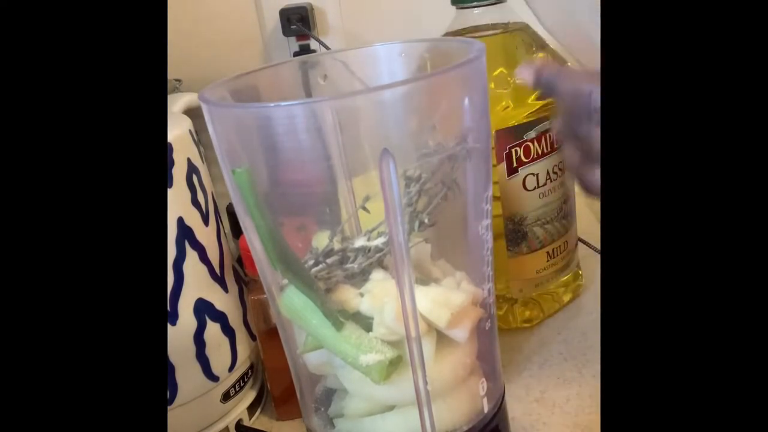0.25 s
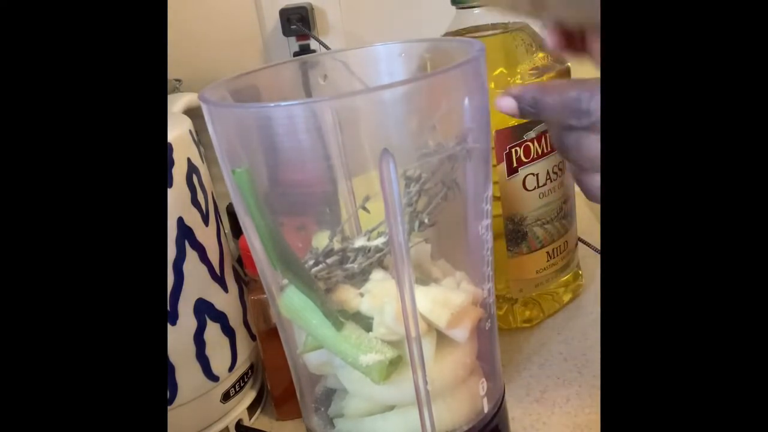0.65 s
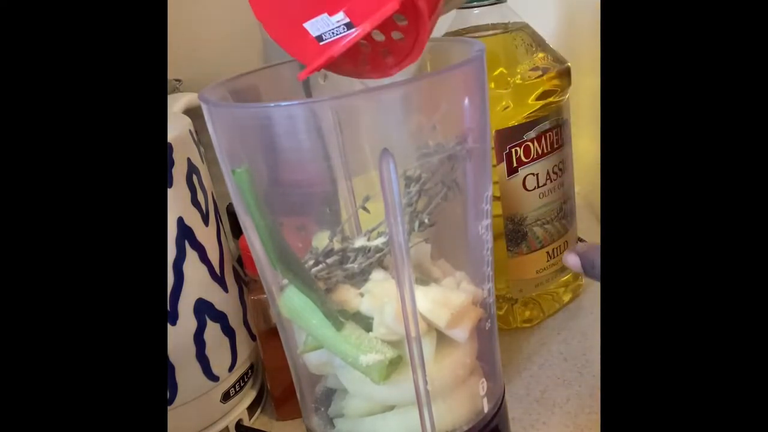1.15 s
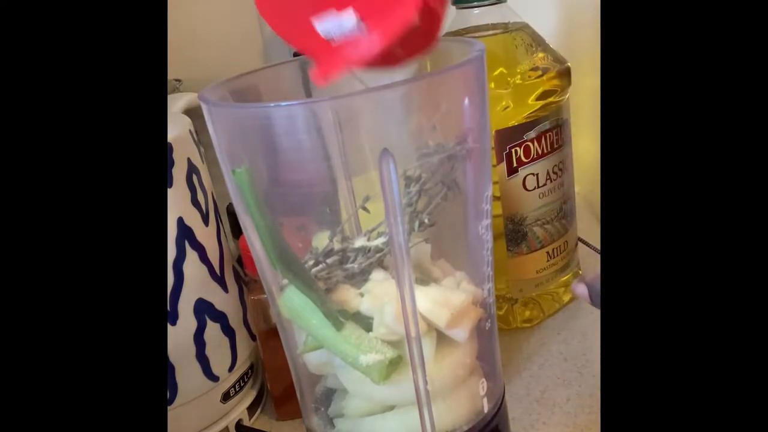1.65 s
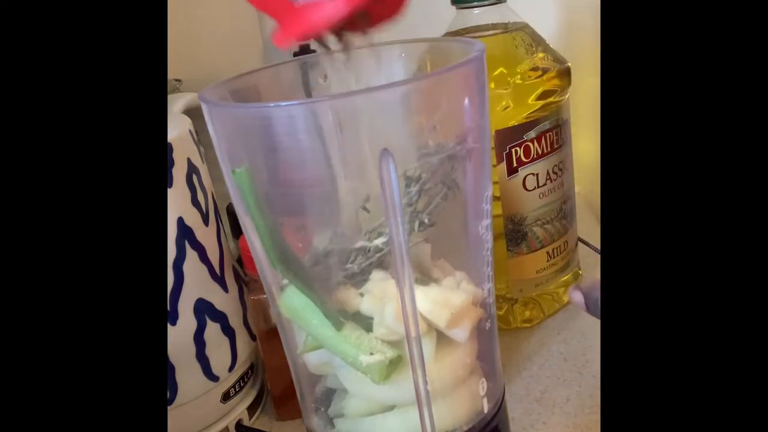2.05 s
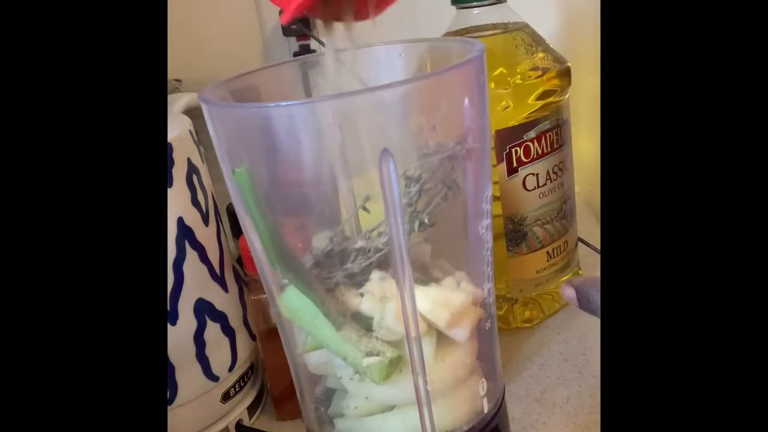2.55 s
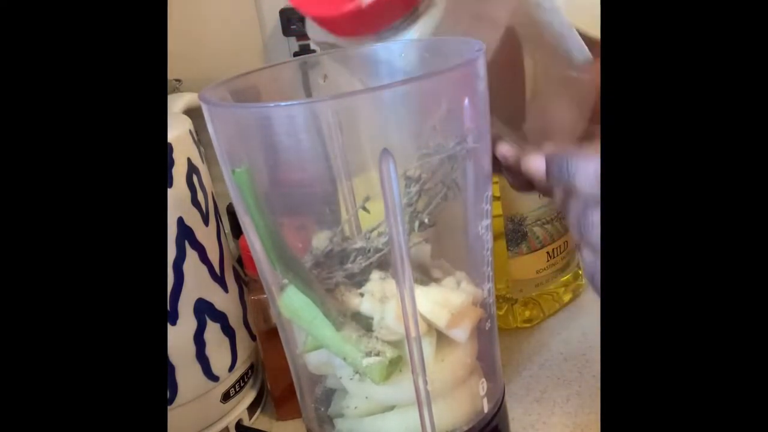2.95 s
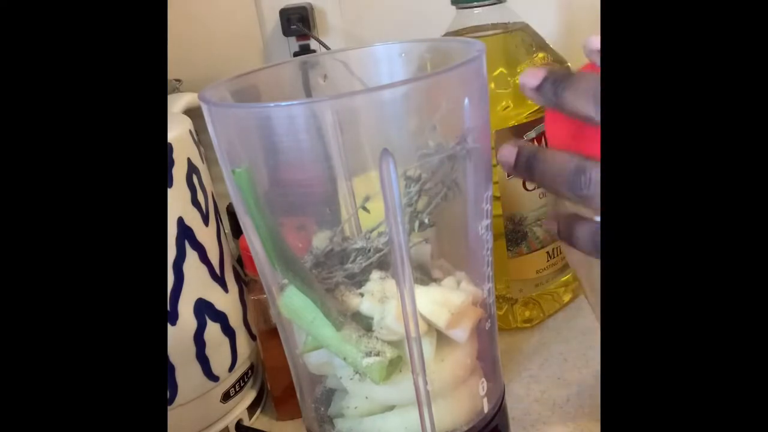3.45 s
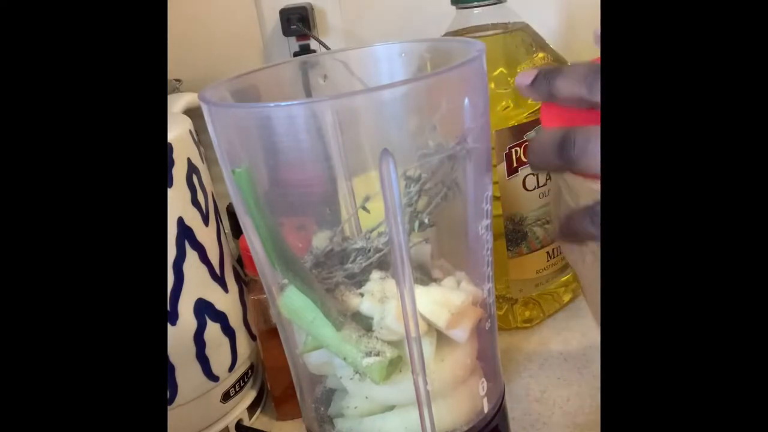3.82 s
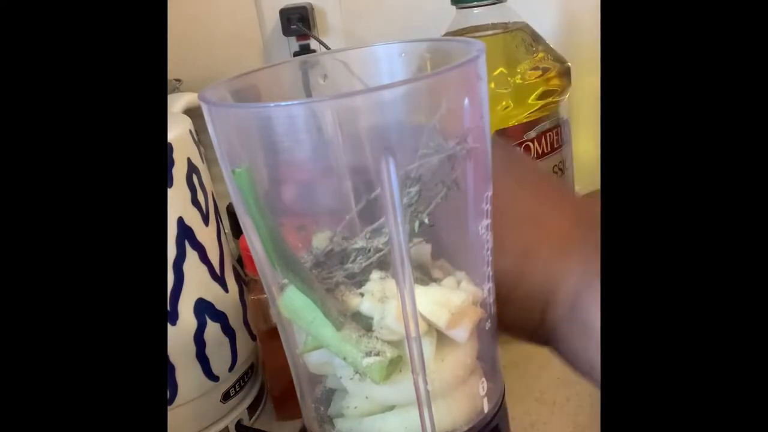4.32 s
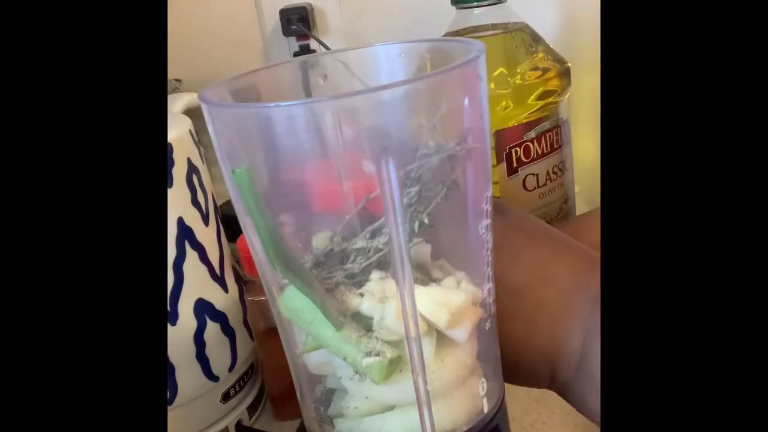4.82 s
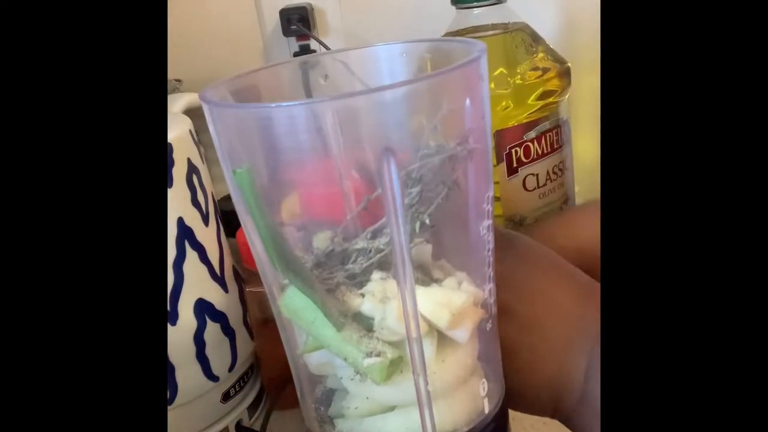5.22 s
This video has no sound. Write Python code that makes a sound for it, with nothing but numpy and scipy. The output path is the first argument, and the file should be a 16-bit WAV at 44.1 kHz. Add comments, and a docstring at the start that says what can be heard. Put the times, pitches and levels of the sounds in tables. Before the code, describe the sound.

Sparse plastic taps and faint spice rustles in a humming kitchen give way to a sharp lid snap, counter bumps and clinking jars.

```python
"""Spice shaker handled among jars

A plastic shaker is opened, tipped over a blender cup, snapped shut and pushed back among other jars.
Blows sum contact noise, decaying modes and low thumps; spice is random grains heard through a hollow.
Skin and pushed jars are coloured slip noise. A refrigerator hums in wavering lines over a dull rush.
Two microphone ports hear the handling from just to the right, with early scatter and a short tail."""
import sys
import numpy as np
from scipy import signal
from scipy.fft import rfft, irfft
from scipy.io import wavfile

SR = 44100
rng = np.random.default_rng(int(sys.argv[2]) if len(sys.argv) > 2 else 0)


def waveform_to_disk(signal):
    """Save audio, clipped to [-1, 1], as 16-bit WAV at the path in sys.argv[1]."""
    frames = np.transpose(np.atleast_2d(signal))
    scaled = np.clip(frames, -1, 1) * 32767
    samples = np.round(scaled).astype(np.int16)
    wavfile.write(sys.argv[1], SR, samples)


N = 241528
TIME_S = np.arange(N) / SR
FREQ_HZ = np.maximum(np.arange(N // 2 + 1) * SR / N, 1)

# Blow tables; levels are relative to the offsets given to strike():
# start_s, ring_db, crack_db, thud_db, modes_up_to_hz, ring_length_ratio, pitch_ratio
# shaker cap flicked and tapped, damped by fingers
CAP_CLICKS = [(1.6453, -21, -29, -38, 6000, 1.25, 1.0), (1.6525, -29, -39, -40, 900, 1.0, 1.1),
              (2.711, -33, -54, -43, 3500, 0.2, 1.0), (2.7205, -27, -42, -39, 4000, 0.22, 1.1),
              (2.782, -39, -58, -44, 1700, .3, 1.0), (2.8887, -35, -51, -64, 5000, 0.2, 1.3),
              (2.8905, -20.5, -72, -48, 1400, 0.28, 1.0), (2.8945, -23.5, -66, -47, 626, .7, 1.1),
              (2.901, -25, -70, -50, 800, .5, 1.0)]
# jar shut and put down
JAR_KNOCKS = [(3.490, -29, -59, -47, 1390, 0.48, 0.87), (3.6322, -16.5, -33, -56, 7050, 0.84, 1.0),
              (3.6362, -13.5, -44, -55, 600, 0.7, 1.0), (3.64, -20.5, -55, -58, 1690, 1.0, 1.01),
              (4.301, -32, -53.5, -55, 3200, 1, 1.35), (4.369, -30, -50, -58, 2570, 0.79, 1.33)]
# jar clattering against neighbours of different sizes
CLINKS = [(4.963, -29.5, -59, -52, 2600, .55, 1.05), (4.977, -30, -56, -62, 5000, 0.55, 0.95),
          (4.997, -32, -62, -55, 1200, .8, 1.0), (5.0168, -22.5, -40, -58, 6100, .45, 1.95),
          (5.0462, -22, -42, -54, 5000, 0.9, 1.05), (5.056, -36, -50, -58, 4500, .6, 1.19),
          (5.065, -35, -53, -60, 4000, 0.6, 1.0), (5.081, -31.5, -61, -52, 1500, 0.55, 1.34),
          (5.133, -43, -56, -51, 5000, .5, 1.8), (5.154, -47, -72, -55, 2500, .6, 1.8),
          (5.188, -36.5, -60, -56, 5000, 0.24, 1.28)]
# jars bumping on the counter
BUMPS = [(3.974, -42, -52.5, -37, 1800, 0.36, 1.1), (3.980, -21.5, -54, -34, 1500, 0.69, 0.98),
         (4.012, -33, -51, -50, 1900, 0.5, 1.1), (4.044, -44, -68, -47, 1200, 0.77, 0.72),
         (4.060, -35, -64, -43, 1200, 0.9, 0.95), (4.138, -35, -47.5, -57, 1800, 0.81, 0.93),
         (4.2081, -27, -65, -53, 1770, 1, 1.04), (4.227, -24, -69, -44, 1100, 0.4, 0.95),
         (4.232, -26.5, -65, -37, 1760, 1, 1.006), (4.244, -35.5, -67, -38, 1500, 0.92, 1.22),
         (4.303, -26, -47, -38.5, 1300, 0.8, 1.01), (4.503, -30, -71, -36, 900, 0.41, 0.84),
         (5.213, -35.5, -78, -58, 804, 0.61, 0.89)]
# low thump as the weight of a jar or hand follows a blow: start_s, peak_db, pitch_hz, swell_s
THUMPS = [(1.657, -35.5, 75, 0.012), (2.7204, -38, 417, 0.0022), (2.723, -36, 88, .009),
          (2.893, -33.5, 517, 0.0042), (3.491, -35.5, 298, 0.0046), (3.980, -21.5, 289, 0.0041),
          (3.99, -25, 82, 0.0051), (4.011, -39, 227, 0.0029), (4.243, -35, 80, 0.0043),
          (4.308, -30, 206, 0.0032), (4.368, -30, 283, 0.003), (4.964, -31, 215, 0.002),
          (4.9805, -25.5, 175, 0.0025), (5.012, -35, 222, 0.0055), (5.048, -39.5, 252, 0.0089),
          (5.211, -32.5, 314, 0.0019)]

# Mode tables, level relative: mode_hz, level_db, t60_s
# cap
CAP_MODES = [(303, -4, .1), (410, -5, .04), (592, -4, .07), (690, -8, .035), (1058, -3, .06),
             (1160, 5, .05), (1330, -3, .025), (1614, -4, .05), (1830, -5, .022), (2234, -7, .04),
             (2358, -5, .05), (2810, -13, .04), (3031, -16, .03), (3330, -13, .02)]
# hollow jar
JAR_MODES = [(458, 1, .08), (527, 0, .07), (760, -7, .035), (857, -1, .06), (1061, -4, .05),
             (1255, 2, .055), (1400, 1, .03), (1520, 1, .05), (1850, -3, .02), (2500, -6, .016),
             (3122, -7, .012), (3600, -9, .012), (4162, -8, .018)]
# neighbouring jars
NEIGHBOUR_MODES = [(700, 1, .07), (775, 0, .045), (890, -3, .035), (1020, -1, .04), (1300, -4, .025),
                   (1550, -6, .025), (2550, -11, .02), (2950, -10, .025), (3300, -14, .02), (4300, -7, .02)]
# jar standing on the counter
COUNTER_MODES = [(235, -12, .08), (305, -7, .07), (440, -1, .05), (520, 3, .055), (635, -4, .04),
                 (880, -12, .025), (1250, -12, .025), (1900, -13, .025)]

# Spectra, level relative: freq_hz, level_db_per_hz
# crack of a contact
CRACK_SPECTRUM = [(800, -8), (2500, 1), (6500, 0), (9800, -1), (15500, -8)]
# clack of the plastic wall
CLACK_SPECTRUM = [(150, 4.5), (350, 15.5), (600, 14), (1300, 0.5), (2000, -21.5), (3200, 9.5), (6000, -26)]
# dull thud
THUD_SPECTRUM = [(30, -14), (70, 1), (110, 1), (250, -5), (450, -18), (1000, -40)]
# spice grains, also grit under a jar
SPICE_SPECTRUM = [(400, -8), (1500, 0), (6500, -2), (15000, -12)]
# skin on plastic
SKIN_SPECTRUM = [(400, -4), (1200, 2), (2300, 0), (6000, 1), (9500, -1.5), (15500, -5)]
# jar scraping the counter
SCRAPE_SPECTRUM = [(80, -8), (180, 10.5), (320, 7), (500, 0.5), (700, -1.5), (1000, -12.5), (1600, -5),
                   (2200, -16), (4000, -15)]
# rumble of the microphone in the hand
RUMBLE_SPECTRUM = [(35, -17), (65, 2), (100, -19.5), (200, -8.5), (400, -32)]
# air of the kitchen
AIR_SPECTRUM = [(20, -23), (40, -6), (65, 1.5), (95, -1.5), (140, 3.5), (200, -7), (270, -17), (360, -8.5),
                (490, -8), (680, -14.5), (950, -21), (1350, -19), (2000, -37), (2900, -39), (6000, -114),
                (15000, -65)]

# shakes throwing spice along the shaker: start_s, hollow_db, hiss_db, settle_s, hollow_hz
SHAKES = [(0.221, -63.5, -74, .006, 2780), (0.238, -62.5, -71, 0.023, 1770),
          (0.277, -64.5, -84, 0.011, 2850), (0.445, -64.5, -71, 0.032, 2250),
          (0.855, -60.5, -83, .008, 3600), (0.88, -63, -60.5, 0.063, 3200), (1.283, -52, -88, 0.0093, 2760),
          (1.316, -58.5, -61, 0.048, 3180), (2.177, -66.5, -69, 0.017, 3740),
          (2.261, -58, -57.5, 0.012, 3400), (2.285, -48, -73, 0.038, 2700), (3.966, -52, -64, 0.014, 3100),
          (4.474, -58.5, -69, .02, 3150)]
# skin brushing plastic: start_s, length_s, level_db
STROKES = [(-.06, 0.19, -70), (0.345, 0.26, -71.5), (0.95, 0.32, -64.5), (1.31, 0.35, -73),
           (1.772, 0.053, -70), (1.91, 0.061, -70), (2.008, 0.1, -74.5), (2.936, 0.31, -62.5),
           (3.176, 0.14, -58), (3.305, 0.14, -61.5), (3.773, 0.079, -65), (3.978, 0.12, -57),
           (4.087, 0.2, -49.5), (4.45, 0.1, -73), (4.834, 0.26, -68.5), (5.362, 0.42, -67.5)]
# jar pushed over the counter: start_s, length_s, level_db
PUSHES = [(3.998, 0.56, -42), (4.958, 0.25, -41.5)]
# microphone shifting in the hand: time_s, level_db
HANDLING_LEVEL = [(.74, -65), (.79, -41.5), (.83, -40.5), (.9, -52), (1.1, -70)]
# refrigerator lines: line_hz, level_db_rms, waver_db
HUM_LINES = [(120.1, -46, 2.8), (173, -57.5, 4), (210.3, -54.5, 3), (230, -59, 3), (297, -61, 4.5),
             (418, -62, 2.5), (483.4, -61, 4), (626, -67, 2)]
# room decay: freq_hz, t60_s
ROOM_DECAY = [(150, 0.23), (600, 0.24), (3000, 0.25), (8000, 0.25), (16000, 0.022)]

MODE_SPREAD_DB, SCATTER_DECAY_S = 2, 0.021  # treble of a crack scatters about the counter
SPICE_RISE_S, SPICE_HOLD_S = 0.0052, 0.0086  # grains land together, then settle
CAP_HISS_DB, KNOCK_HISS_DB = -6, 2  # spice hiss, relative to crack_db
BUMP_HISS_DB = -29.5  # relative to ring_db
HISS_FALL_S = 0.015
UPRIGHT_HZ, TIPPED_HZ = 3840, 2340  # hollow resonance with the shaker standing, tipped
WALL_CUT_HZ = 7000  # wall muffles the grains
WALL_DB, WALL_HZ = -9, 1400  # grains drum on the wall, relative to the hollow
STROKE_ATTACK_S, STROKE_RELEASE_S = 0.007, 0.059
STROKE_ARCH_DB = 5.5  # hand fastest in mid-stroke
SLIPS_PER_S, SLIP_SPREAD_DB = 7000, 2.2
GRIP_DB = -80.5  # fingers at rest on the shaker
PUSH_ATTACK_S, PUSH_RELEASE_S, PUSH_SAG_DB_PER_S = 0.037, 0.056, 14.5  # breaks loose, slows
GRIT_DB, GRIT_PER_S, GRIT_SPREAD_DB, GRIT_CLUMP_DB = -25, 1300, 3, 3.5
JUDDER_DB, JUDDERS_PER_S = -6, 130  # jar foot catches and slips, relative to the push
RATTLE_START_S, RATTLE_LENGTH_S, RATTLE_RISE_S, RATTLE_FALL_S = 4.965, 0.12, 0.0036, 0.027
RATTLE_DB, RATTLES_PER_S = -50, 160
AIR_DB = -47
PORT_LAG_SAMPLES, PORT_SPACING_M = 5, 0.19
TAIL_CUT_HZ = 6100  # dull room tail
RECORD_CUT_HZ = 15900


def from_db(db):
    """Decibels to gain."""
    return 10 ** (np.asarray(db) / 20)


def rms_one(x):
    """Scale to unit power."""
    return x / np.sqrt(np.mean(x ** 2) + 1e-20)


def level(rows):
    """Gain over time from time_s, level_db rows."""
    return from_db(np.interp(TIME_S, *np.transpose(rows)))


def at_hz(points, hz):
    """Read a table on a log-frequency axis."""
    freq_hz, value = np.transpose(points)
    return np.interp(np.log(hz), np.log(freq_hz), value)


def colour(x, spectrum):
    """Give a steady signal a spectrum that falls away beyond its ends; rms 1."""
    low_skirt = np.minimum(1, FREQ_HZ / spectrum[0][0]) ** 2
    high_skirt = np.minimum(1, spectrum[-1][0] / FREQ_HZ) ** 2
    gain = from_db(at_hz(spectrum, FREQ_HZ)) * low_skirt * high_skirt
    return rms_one(irfft(rfft(x) * gain, N))


def lowpass(x, cut_hz, order=2):
    """Butterworth treble cut."""
    return signal.lfilter(*signal.butter(order, cut_hz, fs=SR), x)


def white():
    """Plain noise."""
    return rng.standard_normal(N)


def drift(rate_hz):
    """Slow random wander with spread 1."""
    return rms_one(irfft(rfft(white()) / (1 + (FREQ_HZ / rate_hz) ** 4), N))


def grains(per_s, spread_db):
    """Tiny collisions of uneven size at random moments."""
    hits = rng.random(N) < per_s / SR
    size_db = spread_db * np.minimum(rng.exponential(1, N), 4)
    return hits * rng.choice([-1, 1], N) * from_db(size_db)


def diffuse():
    """Noise from all sides: the two ports agree only on long waves."""
    alike = np.sinc(2 * FREQ_HZ * PORT_SPACING_M / 343)
    mid = irfft(rfft(white()) * np.sqrt(1 + alike), N)
    side = irfft(rfft(white()) * np.sqrt(1 - alike), N)
    return np.array([mid + side, mid - side]) / np.sqrt(2)


def delay(x, lag_s):
    """The same sound, later."""
    return np.interp(TIME_S - lag_s, TIME_S, x, left=0)


def gesture(start_s, length_s, attack_s, release_s):
    """Gain that swells up to the start, holds for the length and dies away."""
    swell = (TIME_S - start_s) / attack_s
    fall = (start_s + length_s - TIME_S) / release_s
    return np.exp(np.minimum(0, np.minimum(swell, fall)))


def bursts(starts_s, levels_db, decay_s, rise_s=0.0001):
    """Envelopes that swell quickly and die away."""
    out = np.zeros(N)
    for start_s, db in zip(starts_s, levels_db):
        age_s = np.maximum(TIME_S - start_s, 0)
        out += from_db(db) * (1 - np.exp(-age_s / rise_s)) * np.exp(-age_s / decay_s)
    return out


def ring(clicks, hz, t60_s):
    """Two-pole resonator: a unit click starts a decaying sine of height 1."""
    radius, angle = from_db(-60 / (t60_s * SR)), 2 * np.pi * hz / SR
    feedback = [1, -2 * radius * np.cos(angle), radius * radius]
    return signal.lfilter([0, np.sin(angle)], feedback, clicks + 1e-18)


def strike(rows, modes, ring_db, crack_db, clack_db, thud_db,
           contact_s, seat_lag_s, clack_decay_s, thud_decay_s, scatter_db=-21):
    """Contact cracks; the seating part clacks in dense wall modes, rings in clear ones and thuds."""
    start_s, body_db, crack, thud, bright_hz, length, pitch = np.transpose(rows)
    seated_s, out = start_s + seat_lag_s, np.zeros(N)
    hz, mode_db, t60_s = np.transpose(modes)[:, :, None]
    t, signs = TIME_S[:SR // 4], (-1) ** np.arange(len(modes))
    wall = colour(white(), CLACK_SPECTRUM)
    for k, first in enumerate(np.round(seated_s * SR).astype(int)):
        reach = 1 / np.sqrt(1 + (hz * pitch[k] / bright_hz[k]) ** 8)
        uneven_db = MODE_SPREAD_DB * rng.standard_normal(hz.shape)
        heights = reach * from_db(mode_db + ring_db + uneven_db)
        decays = from_db(-60 * t / (t60_s * length[k]))
        rings = signs @ (heights * decays * np.sin(2 * np.pi * hz * pitch[k] * t))
        clack = np.roll(wall, -first)[:len(t)] * from_db(clack_db) * np.exp(-t / clack_decay_s)
        clack = lowpass(clack, bright_hz[k])
        out[first:first + len(t)] += from_db(body_db[k]) * (rings + clack)[:N - first]
    direct = bursts(start_s, crack + crack_db, contact_s)
    scattered = bursts(start_s, crack + crack_db + scatter_db, SCATTER_DECAY_S)
    out += colour(white(), CRACK_SPECTRUM) * (direct + scattered)
    # heavy parts take longer to get moving
    heavy = bursts(seated_s, thud + thud_db, thud_decay_s, rise_s=0.011)
    return out + colour(white(), THUD_SPECTRUM) * heavy


def thumps():
    """Soft, heavy contacts: sines that swell and die within a few swings."""
    out = np.zeros(N)
    for start_s, peak_db, hz, swell_s in THUMPS:
        age_s = np.maximum(TIME_S - start_s, 0)
        envelope = age_s / swell_s * np.exp(1 - age_s / swell_s)
        out += from_db(peak_db) * envelope * np.sin(2 * np.pi * hz * age_s)
    return out


def blows():
    """Cap clicks, jar knocks, clinks and counter bumps, each in its own modes, plus thumps."""
    cap = strike(CAP_CLICKS, CAP_MODES, ring_db=-9.5, crack_db=4.0, clack_db=-10.5, thud_db=5.5,
                 contact_s=0.0018, seat_lag_s=0.0011, clack_decay_s=0.007, thud_decay_s=0.015)
    jar = strike(JAR_KNOCKS, JAR_MODES, ring_db=-12.5, crack_db=7.0, clack_db=-13.5, thud_db=-8,
                 contact_s=0.0021, seat_lag_s=0.00108, clack_decay_s=0.0062, thud_decay_s=0.0069)
    clinks = strike(CLINKS, NEIGHBOUR_MODES, ring_db=-11.0, crack_db=6, clack_db=-14.0, thud_db=-10,
                    contact_s=0.0022, seat_lag_s=0, clack_decay_s=0.0076, thud_decay_s=0.0089)
    bumps = strike(BUMPS, COUNTER_MODES, ring_db=0.5, crack_db=5, clack_db=-11.5, thud_db=6.5,
                   contact_s=0.0038, seat_lag_s=0, clack_decay_s=0.0099, thud_decay_s=0.014)
    return cap + jar + clinks + bumps + thumps()


def hollow(rush, hz, q, open_db):
    """Grains heard through the shaker's resonant hollow and directly."""
    resonant = rms_one(signal.lfilter(*signal.iirpeak(hz, q, fs=SR), rush))
    return rms_one(resonant + from_db(open_db) * rush)


def hiss_swells(swells):
    """Spice hiss swells around each given moment, then dies away; the loudest swell prevails."""
    envelopes = [from_db(db) * gesture(time_s + SPICE_RISE_S, 0, SPICE_RISE_S, HISS_FALL_S)
                 for time_s, db in swells]
    return np.max(envelopes, axis=0)


def spice(rush_db=-22, wall_q=1.1, swell_rush_db=-1, hollow_q=6):
    """Grains sound the hollow at shakes, and hiss around cap clicks, jar knocks and counter bumps.

    The pitch of the hollow shifts with how the spice lies."""
    rush = colour(grains(per_s=4500, spread_db=3), SPICE_SPECTRUM)
    rush = rms_one(lowpass(rush, WALL_CUT_HZ))
    cap_swells = [(s, crack_db + CAP_HISS_DB) for s, _, crack_db, *_ in CAP_CLICKS]
    bump_swells = [(s, body_db + BUMP_HISS_DB) for s, body_db, *_ in BUMPS]
    knock_swells = [(s, crack_db + KNOCK_HISS_DB) for s, _, crack_db, *_ in JAR_KNOCKS]
    tipped = hollow(rush, TIPPED_HZ, hollow_q, swell_rush_db)
    upright = hollow(rush, UPRIGHT_HZ, hollow_q, swell_rush_db)
    out = hiss_swells(cap_swells + bump_swells) * tipped + hiss_swells(knock_swells) * upright
    wall = from_db(WALL_DB) * hollow(rush, WALL_HZ, wall_q, rush_db)
    for start_s, hollow_db, hiss_db, settle_s, hz in SHAKES:
        body = hollow(rush, hz, hollow_q, rush_db) + wall
        landing = from_db(hollow_db) * body + from_db(hiss_db) * rush
        out += gesture(start_s, SPICE_HOLD_S, SPICE_RISE_S, settle_s) * landing
    return out


def judder(modes, per_s):
    """Uneven slips of a moving jar; the level of each mode wanders randomly by itself."""
    slips = grains(per_s, spread_db=1.5)
    return rms_one(sum(ring(slips * from_db(db + 2.1 * drift(27)), hz, t60_s)
                       for hz, db, t60_s in modes))


def skin():
    """Skin slips finely over plastic in arching strokes, above a steady grip."""
    hand = from_db(GRIP_DB)
    for start_s, length_s, db in STROKES:
        off_middle = np.clip(2 * (TIME_S - start_s) / length_s - 1, -1, 1)
        arch = from_db(db - STROKE_ARCH_DB * off_middle ** 2)
        stroke = arch * gesture(start_s, length_s, STROKE_ATTACK_S, STROKE_RELEASE_S)
        hand = np.maximum(hand, stroke)
    slips = colour(grains(SLIPS_PER_S, SLIP_SPREAD_DB), SKIN_SPECTRUM)
    return hand * from_db(0.75 * drift(36)) * slips


def pushed_jar():
    """A pushed jar scrapes, grinds grit and judders, slowing as it goes."""
    push = 0
    for start_s, length_s, db in PUSHES:
        sag_db = PUSH_SAG_DB_PER_S * np.clip(TIME_S - start_s, 0, length_s)
        envelope = gesture(start_s, length_s, PUSH_ATTACK_S, PUSH_RELEASE_S)
        push = push + from_db(db - sag_db) * envelope
    scrape = colour(grains(per_s=2500, spread_db=0.0), SCRAPE_SPECTRUM)
    scrape = from_db(-4.0 + 3.14 * drift(38)) * scrape
    grit = colour(grains(GRIT_PER_S, GRIT_SPREAD_DB), SPICE_SPECTRUM)
    grit = from_db(GRIT_DB + GRIT_CLUMP_DB * drift(40)) * grit
    catches = from_db(JUDDER_DB) * judder(COUNTER_MODES, JUDDERS_PER_S)
    return push * (scrape + grit + catches)


def rattle():
    """Jars pressed together chatter in small contacts between the clear blows."""
    envelope = gesture(RATTLE_START_S, RATTLE_LENGTH_S, RATTLE_RISE_S, RATTLE_FALL_S)
    return from_db(RATTLE_DB) * envelope * judder(NEIGHBOUR_MODES, RATTLES_PER_S)


def kitchen(x, room_db, near_db, near_decay_s):
    """Cup, counter and wall scatter at once, then a short tail; the right port hears first."""
    t, noise, tail = TIME_S[:SR // 2], diffuse()[:, :SR // 2], 0
    edges_hz = np.geomspace(70, 18000, 9)
    for low, high in zip(edges_hz, edges_hz[1:]):
        band_filter = signal.butter(2, [low, high], "band", fs=SR, output="sos")
        band = signal.sosfilt(band_filter, noise)
        tail = tail + band * from_db(-60 * t / at_hz(ROOM_DECAY, np.sqrt(low * high)))
    tail = lowpass(rms_one(tail), TAIL_CUT_HZ)
    near = lowpass(diffuse()[:, :len(t)], 5000, order=1) * np.exp(-t / near_decay_s)
    echoes = (from_db(room_db) * tail + from_db(near_db) * rms_one(near)) / np.sqrt(len(t))
    direct = np.array([delay(x, PORT_LAG_SAMPLES / SR), x])
    return direct + signal.fftconvolve(x[None], echoes, axes=1)[:, :N]


def microphone_rumble():
    """The microphone shifts in the hand: low noise swells and fades."""
    return level(HANDLING_LEVEL) * colour(white(), RUMBLE_SPECTRUM)


def refrigerator():
    """Motor and fan lines waver in level and phase over a dull rush that fills the room."""
    lines = np.zeros(N)
    for hz, db, waver_db in HUM_LINES:
        gain = from_db(db + waver_db * drift(8.2)) * np.sqrt(2)
        phase = 2 * np.pi * (hz * TIME_S + rng.random()) + 0.14 * waver_db * drift(18.0)
        lines += gain * np.sin(phase)
    return lines + from_db(AIR_DB) * colour(diffuse(), AIR_SPECTRUM)


def scene():
    """Handling noises in the room, over rumble and hum."""
    knocks = kitchen(blows(), room_db=-11, near_db=-16, near_decay_s=0.004)
    friction = spice() + skin() + pushed_jar() + rattle()
    friction = kitchen(friction, room_db=-17.0, near_db=-52.5, near_decay_s=0.00034)
    return knocks + friction + microphone_rumble() + refrigerator()


def record(dry):
    """Cut the top steeply with an elliptic low-pass."""
    return signal.sosfilt(signal.ellip(10, 0.3, 80, RECORD_CUT_HZ, fs=SR, output="sos"), dry)


dry = scene()
out = record(dry)
waveform_to_disk(out)
```